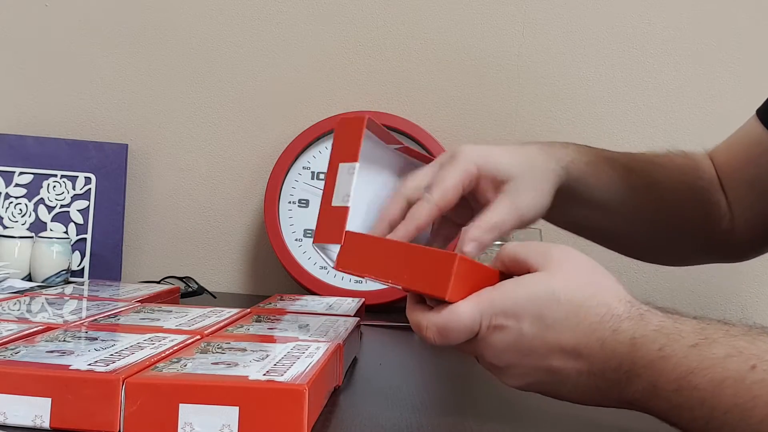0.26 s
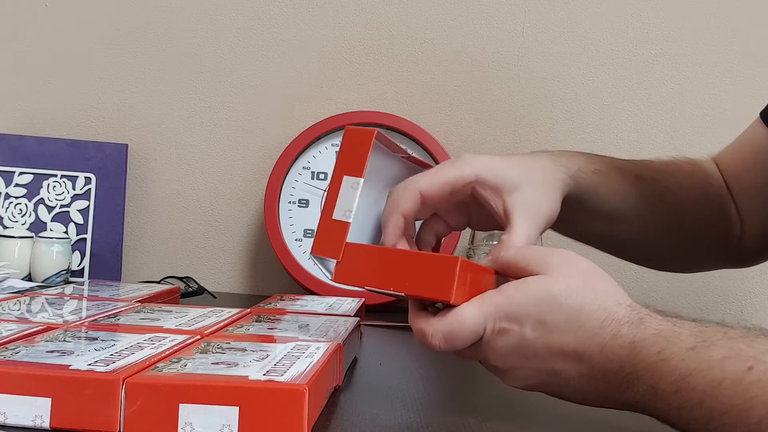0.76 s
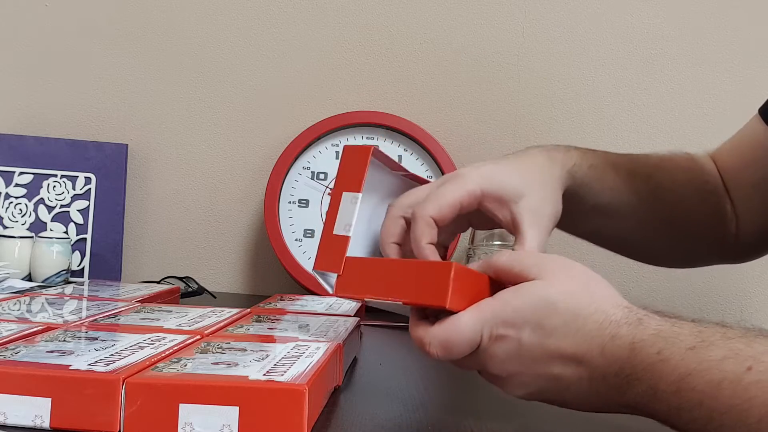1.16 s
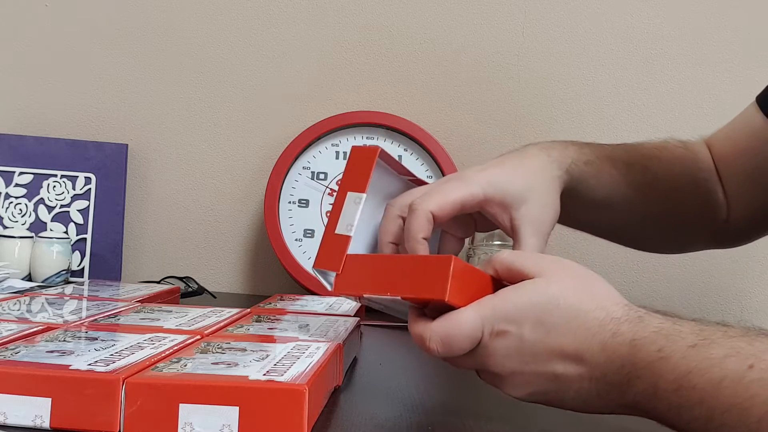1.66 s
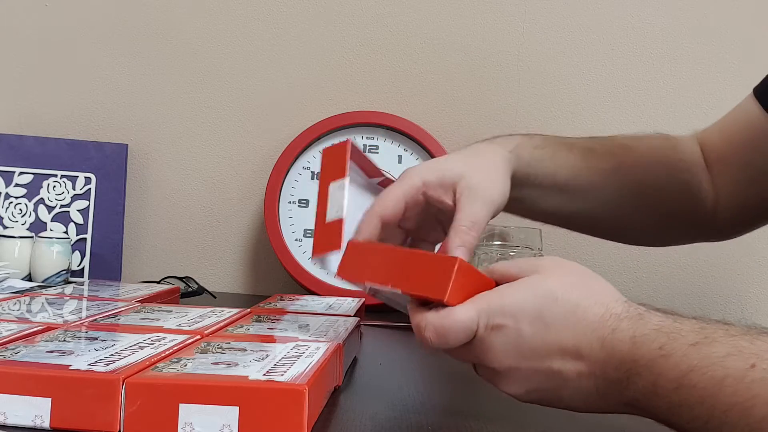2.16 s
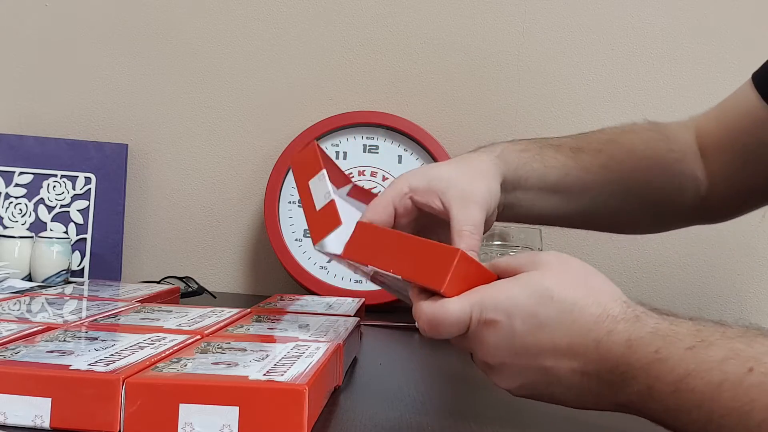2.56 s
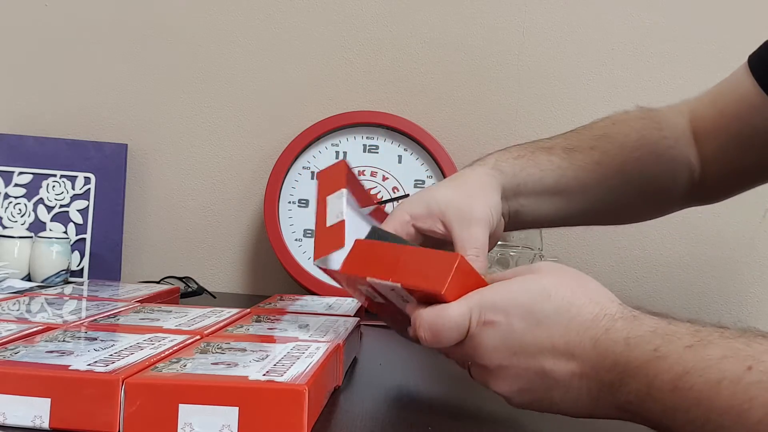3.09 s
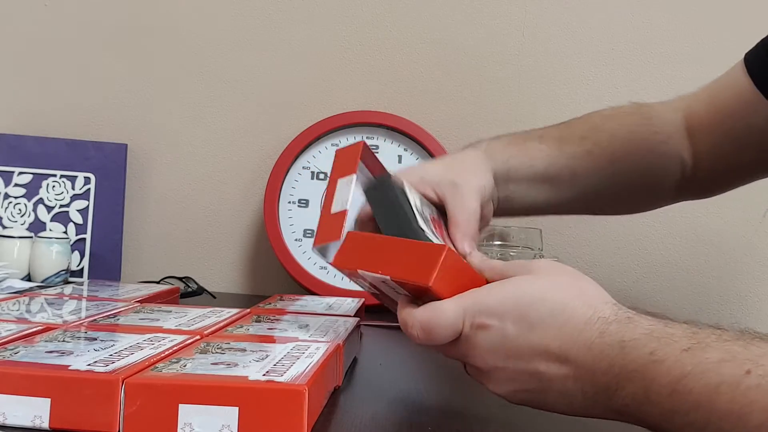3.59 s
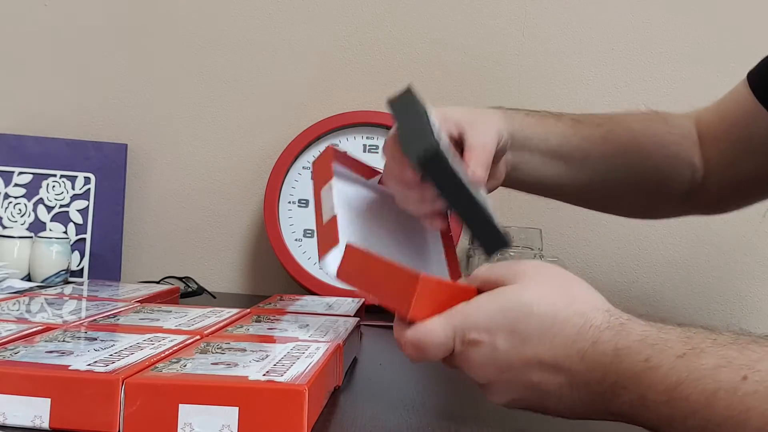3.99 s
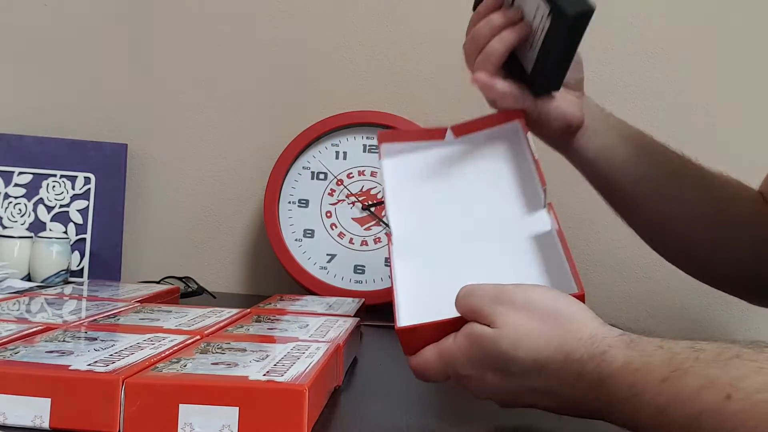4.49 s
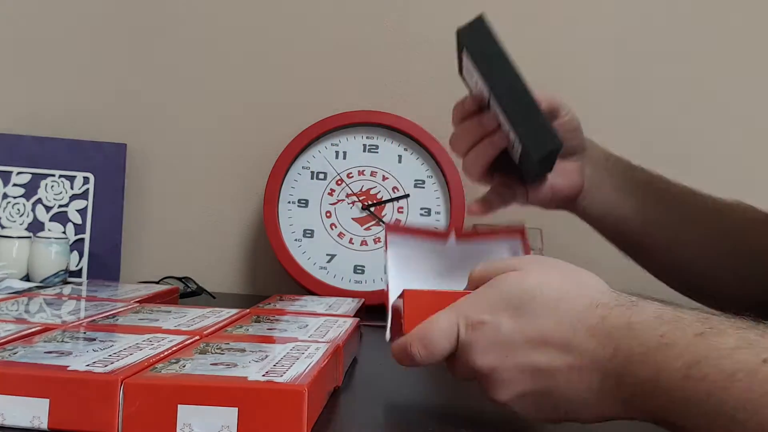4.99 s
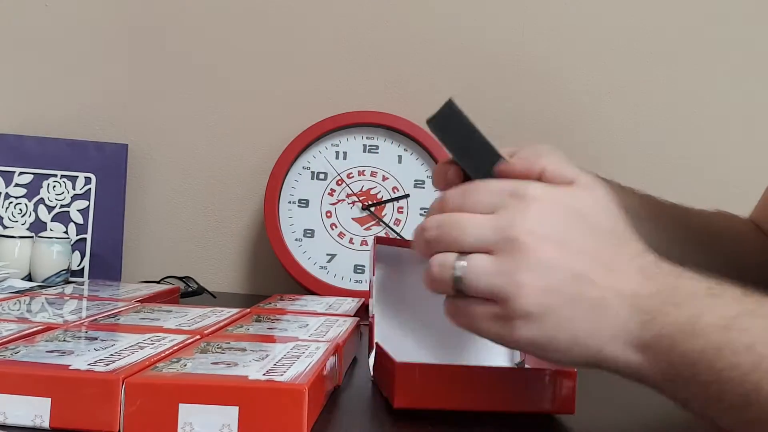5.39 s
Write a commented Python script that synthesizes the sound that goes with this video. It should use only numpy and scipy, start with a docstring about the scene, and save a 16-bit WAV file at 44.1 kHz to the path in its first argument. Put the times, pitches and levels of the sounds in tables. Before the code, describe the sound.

Fingers tap, scrape and rustle on a small cardboard box in a quiet room, then it knocks sharply onto a table over steady hiss.

```python
"""Hands work a block out of a small cardboard box in a quiet room, lift it clear, and set the box down on a table.
First fingers tap, scrape and rub the card: struck modes ring, random stick-slip clicks drive the same modes,
panels pop as the box bends and short noise bursts snap. Then, after 5 s, the box drags in jerks and lands
in a rattle of blows that ring box and table; its flaps chatter.
Throughout, lumpy filtered noise rumbles in the bass and microphone noise hisses over all."""
import sys
import numpy as np
from scipy import signal
from scipy.fft import rfft, irfft
from scipy.io import wavfile
from scipy.ndimage import uniform_filter1d

SR = 44100
rng = np.random.default_rng(int(sys.argv[2]) if len(sys.argv) > 2 else 0)


def to_wav(s):
    """Save 16-bit WAV."""
    ch = np.atleast_2d(s).T  # columns
    pcm = np.round(np.clip(ch, -1, 1) * 32767)  # PCM
    wavfile.write(sys.argv[1], SR, pcm.astype(np.int16))


N = 249160


def amp(db):
    """Gain of a level in dB."""
    return 10 ** (np.asarray(db) / 20)


def evened(x):
    """Scaled to rms 1."""
    return x / np.sqrt(np.mean(x ** 2) + 1e-20)


def read(points, hz):
    """Value of a spectrum table at hz, on a log axis."""
    f, value = np.transpose(points)
    return np.interp(np.log(hz + 1), np.log(f + 1), value)


def shaped(x, points):
    """x through a spectrum table in dB."""
    return irfft(rfft(x) * amp(read(points, np.fft.rfftfreq(N, 1 / SR))), N)


def add(mix, start_s, sound):
    """Lays a sound into the mix at start_s."""
    part = mix[round(start_s * SR):][:len(sound)]
    part += sound[:len(part)]


def likened(left, other, same):
    """Right spectrum that resembles the left by the factor same, at equal power."""
    return same * left + np.sqrt(1 - same ** 2) * other


def ring(modes, hz, octaves, factor):
    """A struck body, peak 1: modes near hz ring most, 6 dB less at the given octaves away."""
    t = np.arange(SR // 3) / SR
    f, db, t60_s = np.transpose(modes)[:, :, None]
    mode_db = db - 6 * (np.log2(f / hz) / octaves) ** 2
    decay = amp(mode_db - 60 * t / (t60_s * factor))
    rise = np.sin(np.pi / 2 * np.minimum(t * f / 1.71, 1)) ** 2  # soft contact: swell over 1.71 cycles
    sound = (decay * rise * np.sin(2 * np.pi * f * t)).sum(0)
    return sound / abs(sound).max()


def slips(per_s, spread_db):
    """Stick-slip: random clicks of uneven size and random sign."""
    size_db = spread_db * np.minimum(rng.exponential(1, N), 5)
    size = amp(size_db) * rng.choice([-1., 1.], N)
    return size * (rng.random(N) < per_s / SR)


def rubbed(level, modes, hz, octaves, factor, per_s, spread_db):
    """Slips that follow a level curve and ring a body."""
    body = ring(modes, hz, octaves, factor)
    body = body / np.linalg.norm(body)
    return signal.oaconvolve(level * evened(slips(per_s, spread_db)), body)[:N]


def strokes(rows, index, edges_db_per_s):
    """Gain of a dB column: each stroke rises, holds for its length and falls; the loudest counts."""
    t = np.arange(0, N, 32) / SR
    rows = np.array(rows)[:, :, None]
    rise_db_per_s, fall_db_per_s = edges_db_per_s
    early_s = np.maximum(rows[:, 0] - t, 0)
    late_s = np.maximum(t - rows[:, 0] - rows[:, 1], 0)
    level_db = rows[:, index] - rise_db_per_s * early_s - fall_db_per_s * late_s
    return np.interp(np.arange(N) / SR, t, amp(level_db.max(0)))


# Modes of the box. Each row: frequency in Hz, level in relative dB, t60 in seconds before the ring factor.
BOX_MODES = [(234.5, 0.5, 0.065), (317.7, 0, 0.088), (458, 2, 0.067), (532, -6.5, 0.09), (690, 5, 0.02),
             (805, 7, 0.053), (995, -5.5, 0.18), (1048, 14, 0.027), (1150, 1, 0.08), (1365, 4, 0.01),
             (1434, 11, 0.022), (1828, 1, 0.044), (2040, 12.5, 0.015), (2310, -13, 0.034),
             (2980, -3, 0.033), (3150, -1, 0.014), (4030, -18, 0.012)]
# Taps on the card. Each row: start in seconds, peak in dB before the mix gain,
# frequency that the struck spot favours in Hz, nail click in dB against that peak.
CARD_TAPS = [(0.138, -53, 880, -22), (0.435, -31, 1110, -2.5), (0.521, -27, 1100, -8),
             (1.043, -46.5, 1150, 9), (1.191, -29.5, 1060, -21), (2.232, -40, 1500, -4),
             (2.309, -41, 1090, 10), (2.47, -38, 972, -3), (2.686, -44, 1890, -2), (3.071, -36, 1090, -10),
             (3.178, -34.5, 1060, -15), (3.239, -36, 1190, -23), (3.424, -28.5, 1060, 1),
             (3.474, -36, 1070, 0), (3.755, -43, 1010, -14), (4.002, -42, 960, 0), (4.913, -46, 1100, -15)]


def taps():
    """Fingers strike the card: a narrow group of box modes rings, with a higher nail click."""
    out = np.zeros(N)
    nail = ring(BOX_MODES, 2540, octaves=0.4, factor=0.89)
    for start_s, db, hz, nail_db in CARD_TAPS:
        card = ring(BOX_MODES, hz, octaves=0.1, factor=0.73)
        add(out, start_s, amp(db) * (card + amp(nail_db) * nail))
    return out


# Hand moves. Each row: start in seconds, length in seconds, then levels in dB before the layer gains:
# rub in the hollow, skin and paper rustle, panels flexing.
HAND_MOVES = [(0.02, .28, -73, -80, -63), (0.43, 0.17, -64, -61.5, -67.5), (0.62, 0.14, -68, -65, -85),
              (1.04, .03, -61, -65, -70), (1.16, 0.056, -64, -59, -67), (1.74, .08, -64.5, -62, -73),
              (1.92, 0.097, -54.5, -52, -55), (2.15, 0.077, -52.5, -52.5, -66),
              (2.44, .08, -54.5, -52.5, -55), (2.56, 0.1, -51.5, -51.5, -54.5),
              (2.82, 0.033, -50.5, -56, -53), (2.95, 0.37, -55.5, -56.5, -65),
              (3.42, 0.28, -59.5, -60.5, -82), (3.67, .12, -63, -65, -57.5), (4.0, 0.014, -70, -62, -56.5),
              (4.23, 0.26, -70, -53, -53.5), (4.33, .14, -53, -70, -50), (4.6, 0.17, -63, -60, -68),
              (4.91, 0.041, -63, -60.5, -62.5), (5.09, 0.045, -69, -54.5, -47.5),
              (5.29, 0.12, -52, -58, -70), (5.46, 0.12, -50, -60.5, -63)]
# Rustle spectrum. Each row: frequency in Hz, level in relative dB.
RUSTLE_SPECTRUM = [(500, -25.5), (1400, -3), (2500, 2), (4000, -2), (8000, -11.5), (12000, -19),
                   (16000, -40)]


def handling():
    """Slips under the hands ring the low panels and the hollow of the box; skin rustles on top."""
    flex_level = strokes(HAND_MOVES, index=4, edges_db_per_s=(540, 70))
    flex = rubbed(flex_level, BOX_MODES, 337, octaves=0.71, factor=0.26, per_s=700, spread_db=3.4)
    rub_level = strokes(HAND_MOVES, index=2, edges_db_per_s=(140, 69))
    rub = rubbed(rub_level, BOX_MODES, 1530, octaves=1.0, factor=0.16, per_s=900, spread_db=1.6)
    rustle_level = strokes(HAND_MOVES, index=3, edges_db_per_s=(270, 48))
    rustle = evened(shaped(slips(per_s=5000, spread_db=3.0), RUSTLE_SPECTRUM)) * rustle_level
    return amp(-7.5) * flex + amp(-2.43) * rub + amp(4.0) * rustle


# Fingertip scrapes along a wall. Each row: start in seconds, length in seconds,
# level in dB before the mix gain, upper modes in dB against it.
WALL_SCRAPES = [(0.118, .012, -55.5, -14), (0.487, .01, -49.5, -8), (0.517, 0.0092, -50, -7),
                (1.126, .018, -55.5, -12), (1.18, .04, -55.5, -2), (2.161, .02, -44, -7),
                (2.18, 0.036, -43, -4.5), (2.316, 0.019, -50, -4), (3.203, 0.033, -53, -17)]


def scrapes():
    """Dense slips at one spot ring the hollow and the upper modes."""
    edges = (800, 350)
    level = strokes(WALL_SCRAPES, index=2, edges_db_per_s=edges)
    hollow = rubbed(level, BOX_MODES, 1090, octaves=0.1, factor=1.0, per_s=900, spread_db=2.8)
    high = [(start_s, length_s, db + upper_db) for start_s, length_s, db, upper_db in WALL_SCRAPES]
    high_level = strokes(high, index=2, edges_db_per_s=edges)
    upper = rubbed(high_level, BOX_MODES, 2330, octaves=0.2, factor=0.68, per_s=1600, spread_db=3.2)
    return hollow + upper


# Panel pops. Each row: start in seconds, peak in dB before the mix gain, favoured frequency in Hz, ring factor.
PANEL_POPS = [(2.048, -56, 312, .7), (2.246, -55, 246, .6), (2.46, -54, 452, .7), (2.816, -45.5, 380, 1.2),
              (2.843, -38, 440, .7), (2.922, -46.5, 468, 1), (3.755, -47, 563, 0.46),
              (4.018, -47, 304, 1.1), (4.242, -47.5, 244, .35), (4.341, -35, 225, 0.14),
              (4.385, -47, 259, .55), (4.41, -51, 240, .45), (4.914, -47, 470, 1.3), (5.093, -48, 367, .85),
              (5.458, -43, 245, 0.78)]


def pops():
    """Panels pop as the box bends: a few neighbouring modes ring."""
    out = np.zeros(N)
    for start_s, db, hz, factor in PANEL_POPS:
        add(out, start_s, amp(db) * ring(BOX_MODES, hz, octaves=0.18, factor=factor))
    return out


# Bright snaps of tape and edges. Each row: start in seconds, rms at onset in dB before the mix gain,
# decay to 1/e in milliseconds.
EDGE_SNAPS = [(0.2124, -30, 2.3), (0.7664, -43, 1.2), (2.3096, -32, 1.4), (2.5502, -29.5, 1.2),
              (2.5809, -29, 1.2), (2.953, -31, 1.3), (5.1374, -16, 0.7)]
# Snap spectrum. Each row: frequency in Hz, level in relative dB.
SNAP_SPECTRUM = [(1500, -33), (3500, 8), (8000, 5), (11000, 1), (16000, -27)]


def snaps():
    """Tape and edges snap: bright noise under a fast exponential decay."""
    out = np.zeros(N)
    crack = evened(shaped(rng.standard_normal(N), SNAP_SPECTRUM))
    t = np.arange(SR // 20) / SR
    for start_s, db, decay_ms in EDGE_SNAPS:
        burst = crack[round(start_s * SR):][:len(t)]
        add(out, start_s, amp(db) * np.exp(-1000 * t / decay_ms) * burst)
    return out


# Modes of the table top. Each row: frequency in Hz, level in relative dB, t60 in seconds before the ring factor.
TABLE_MODES = [(93.6, -17, 0.22), (231, -17, .1), (242.4, -6.5, 0.28), (346.5, 4.5, 0.059),
               (428.6, 2.5, 0.04)]
# Blows of the set-down. Each row: start in seconds, box peak in dB before the mix gain, favoured frequency in Hz,
# spread in octaves, table peak in dB before the mix gain.
LANDING_BLOWS = [(5.1374, -16.5, 1910, 0.69, -19.5), (5.1439, -26.5, 900, 0.79, -29),
                 (5.146, -23, 2230, .3, -45), (5.1492, -20, 2540, 0.62, -26.5),
                 (5.1516, -20.5, 830, .5, -22), (5.155, -22, 690, 0.41, -25.5), (5.16, -36, 325, 0.5, -44),
                 (5.171, -40, 1900, .65, -43), (5.297, -43, 249, 0.83, -44)]


def landing():
    """The box lands edge by edge: each blow rings box and table."""
    out = np.zeros(N)
    table = ring(TABLE_MODES, 240, octaves=1.9, factor=0.67)
    for start_s, db, hz, octaves, table_db in LANDING_BLOWS:
        box = ring(BOX_MODES, hz, octaves, factor=0.48)
        add(out, start_s, amp(db) * box + amp(table_db) * table)
    return out


# Jerks of the drag. Each row: start in seconds, length in seconds, then levels in dB before the layer gains:
# table boom, table hum.
DRAG_JERKS = [(5.082, .045, -52, -49), (5.165, 0.045, -52, -39), (5.225, 0.061, -59, -41.5),
              (5.3, 0.052, -48.5, -39), (5.36, 0.066, -56, -42), (5.465, 0.043, -55.5, -40),
              (5.535, 0.052, -71, -44.5), (5.6, .05, -61, -45.5)]


def dragging():
    """The box slides over the table in jerks: slips ring the table low (boom) and higher (hum)."""
    edges = (640, 400)
    boom_level = strokes(DRAG_JERKS, index=2, edges_db_per_s=edges)
    boom = rubbed(boom_level, TABLE_MODES, 95, octaves=.3, factor=0.55, per_s=260, spread_db=2.2)
    hum_level = strokes(DRAG_JERKS, index=3, edges_db_per_s=edges)
    hum = rubbed(hum_level, TABLE_MODES, 250, octaves=1.0, factor=0.27, per_s=600, spread_db=3.4)
    return amp(2.0) * boom + amp(-4.5) * hum


def chatter():
    """Flaps chatter after the landing: slips ring the box briefly, over a wide range of modes."""
    start_s, hold_s, level_db = 5.17, .03, -46.5
    level = strokes([(start_s, hold_s, level_db)], index=2, edges_db_per_s=(2000, 83))
    return rubbed(level, BOX_MODES, 1400, octaves=1.5, factor=0.13, per_s=700, spread_db=4.6)


# Likeness of the ports for rubbing and room. Each row: frequency in Hz, left-right likeness from 0 to 1.
WIDE_LIKENESS = [(100, 0.95), (250, 0.94), (450, 0.54), (800, 0.017), (2000, 0.026)]


def spread(a, b):
    """Two ports from two draws of a wide source: alike in the bass, almost unrelated above."""
    same = read(WIDE_LIKENESS, np.fft.rfftfreq(N, 1 / SR))
    return np.array([a, irfft(likened(rfft(a), rfft(b), same), N)])


# Room decay. Each row: frequency in Hz, t60 in seconds.
ROOM_T60 = [(100, 0.64), (500, 0.31), (2000, 0.71), (8000, 0.085)]


def room(x):
    """Sparse echoes of random sign, alike at both ports in the bass, each band dying at its own speed."""
    echoes = np.zeros((2, SR // 2))
    at = np.arange(60, SR // 2 - 20, 20)
    at = at + rng.integers(0, 20, (2, len(at)))  # one echo per 20 samples
    signs = rng.choice([-1., 1.], at.shape)
    np.put_along_axis(echoes, at, signs, 1)
    hz, t, z = signal.stft(echoes, SR, nperseg=256)
    z = z * amp(-60 * t / read(ROOM_T60, hz)[:, None])
    same = read(WIDE_LIKENESS, hz)[:, None]  # long waves reach both ports alike
    z = np.array([z[0], likened(z[0], z[1], same)])
    tail = signal.istft(z, SR, nperseg=256)[1]
    tail = tail / np.linalg.norm(tail[0])
    return signal.fftconvolve(x[None], tail, axes=1)[:, :N]


# Bass through table and floor. Each row: time in seconds, mean level in dB before the bass cut.
RUMBLE_LEVEL = [(0.0, -74), (0.3, -81), (1.5, -81), (2.1, -84), (2.3, -74), (2.6, -70), (2.9, -74),
                (3.3, -75), (3.7, -63), (4.1, -64), (4.34, -69), (4.5, -66), (4.8, -58.5), (5.0, -68),
                (5.18, -49.5), (5.65, -72)]
# Rumble spectrum. Each row: frequency in Hz, level in relative dB.
RUMBLE_SPECTRUM = [(25, -34), (38, 10), (47, 13), (60, -3.5), (80, -11), (120, -24)]


def rumble():
    """Lumpy bass noise, nearly alike at both ports."""
    lump_db, lump_s = 3, 0.13  # rms of the swing, span of each smoothing
    common, left, right = (evened(shaped(x, RUMBLE_SPECTRUM)) for x in rng.standard_normal((3, N)))
    span = round(lump_s * SR)
    lumps = evened(uniform_filter1d(uniform_filter1d(rng.standard_normal(N), span), span))
    level_db = np.interp(np.arange(N) / SR, *np.transpose(RUMBLE_LEVEL)) + lump_db * lumps
    return (common + 0.13 * np.array([left, right])) * amp(level_db)


# Hiss spectrum. Each row: frequency in Hz, density in relative dB.
HISS_SPECTRUM = [(60, -24.5), (102, 7.5), (130, -24), (235, -5), (290, -19), (600, -16.5), (1050, -5),
                 (1450, -10.5), (1950, -2), (3600, 3), (7800, 1.5), (9100, -2.5), (11600, -2),
                 (15900, -11.5)]
# Likeness of the hiss at the ports. Each row: frequency in Hz, left-right likeness from -1 to 1.
HISS_LIKENESS = [(60, 0.79), (180, 1), (550, 0.0072), (1650, -0.004), (4970, -0.057), (15000, 0.018)]


def hiss():
    """Smooth microphone noise with faint drifting patches and a slight flutter."""
    rms_db, patch_db, flutter_db = -45.5, 0.8, 0.72  # rms before the port filters
    frames, hz = N // 256 + 5, np.fft.rfftfreq(1024, 1 / SR)
    a, b, c, d, patches = rng.standard_normal((frames, 513, 5)).T
    patches = uniform_filter1d(patches, size=12, axis=0)  # over frequency
    patches = evened(uniform_filter1d(patches, size=10, axis=1))  # over time
    flutter = evened(uniform_filter1d(rng.standard_normal(frames), size=6))
    same = read(HISS_LIKENESS, hz)[:, None]
    left = a + 1j * b
    z = np.array([left, likened(left, c + 1j * d, same)])
    z *= amp(read(HISS_SPECTRUM, hz)[:, None] + patch_db * patches + flutter_db * flutter)
    noise = signal.istft(z, nperseg=1024, noverlap=768)[1][:, :N]
    return amp(rms_db) * evened(noise)


def rubbing():
    """One draw of all wide sources: hands, drag and flaps."""
    return handling() + dragging() + chatter()


def scene():
    """Blows and scrapes come from one spot, left port first; rubbing comes from all over the box."""
    right_delay_s = .00007
    spot = taps() + pops() + landing() + snaps() + scrapes()
    delay = np.exp(-2j * np.pi * np.fft.rfftfreq(N, 1 / SR) * right_delay_s)
    late = irfft(rfft(spot) * delay, N)
    direct = amp(-4.5) * np.array([spot, late])
    wide = amp(0.5) * spread(rubbing(), rubbing())
    return direct + amp(-15.0) * room(spot) + wide + hiss() + rumble()


# Port balance. Each row: frequency in Hz, left minus right in dB.
PORT_BALANCE = [(1000, -0.5), (3000, -0.5), (4500, -2), (7800, -10), (9200, -4), (11500, -3.5),
                (15000, -6.5)]


def record(dry):
    """Bass cut, a right port brighter than the left, then the band limit."""
    bass_cut_hz, band_limit_hz = 38., 15880
    tilt_db = read(PORT_BALANCE, np.fft.rfftfreq(N, 1 / SR)) / 2
    dry = signal.sosfilt(signal.butter(4, bass_cut_hz, "high", fs=SR, output="sos"), dry)
    ports = irfft(rfft(dry) * amp([tilt_db, -tilt_db]), N)
    low_pass = signal.firwin(3071, band_limit_hz, window=("kaiser", 9), fs=SR)
    return signal.oaconvolve(ports, low_pass[None], "same")


dry = scene()
out = record(dry)
to_wav(out)
```